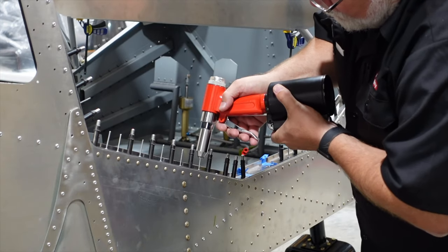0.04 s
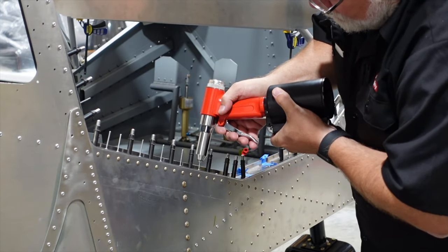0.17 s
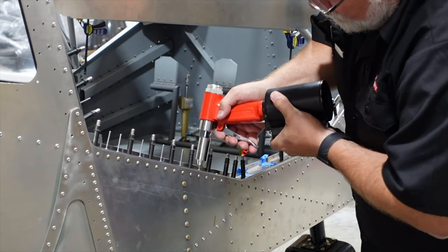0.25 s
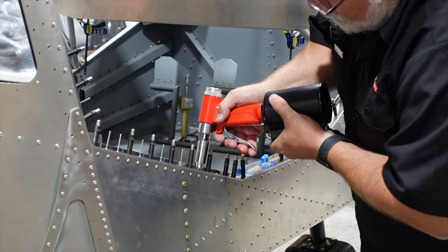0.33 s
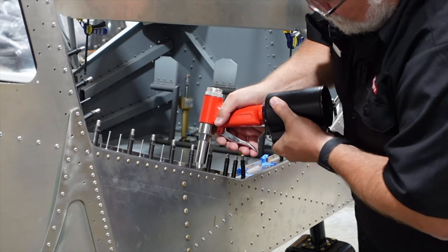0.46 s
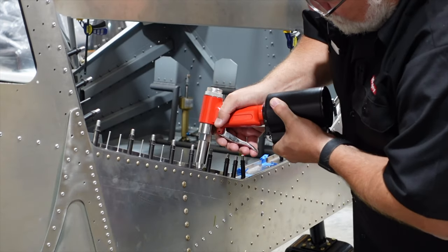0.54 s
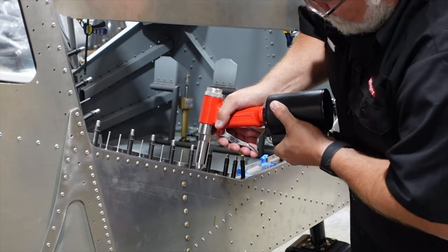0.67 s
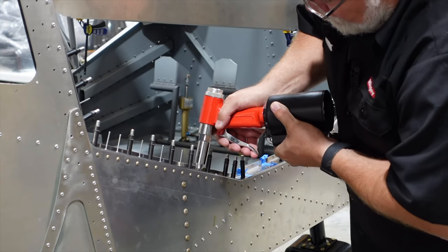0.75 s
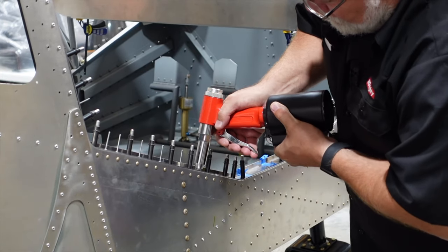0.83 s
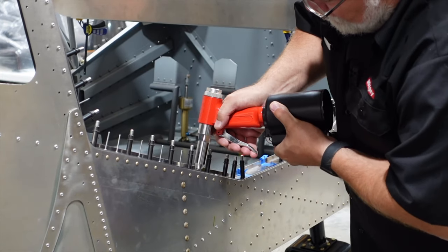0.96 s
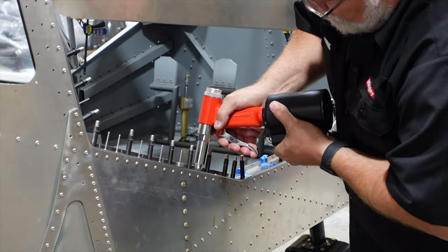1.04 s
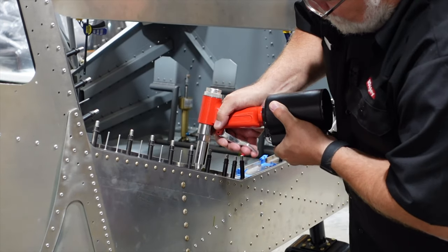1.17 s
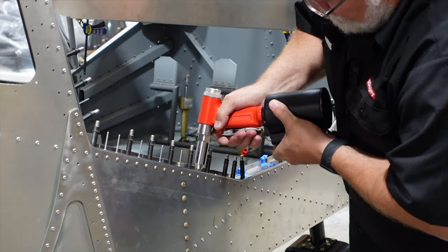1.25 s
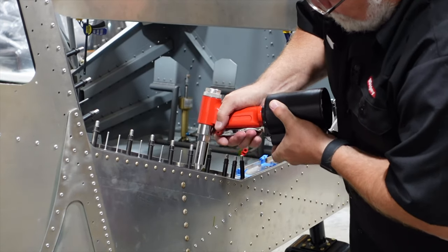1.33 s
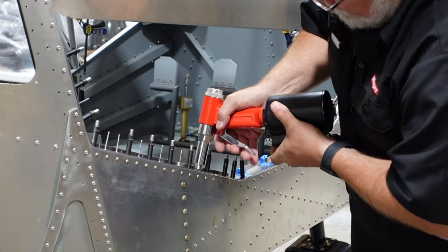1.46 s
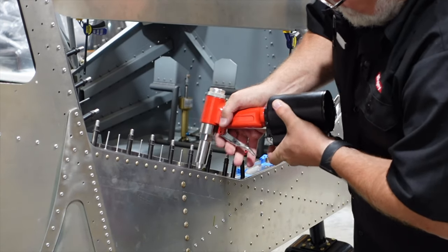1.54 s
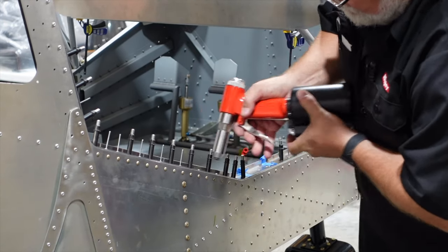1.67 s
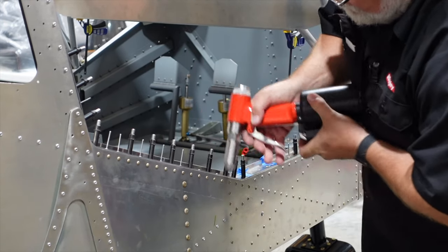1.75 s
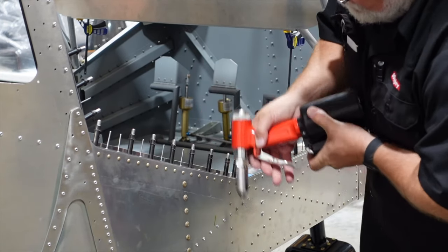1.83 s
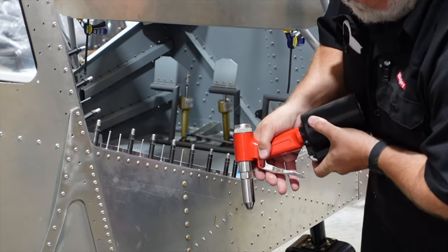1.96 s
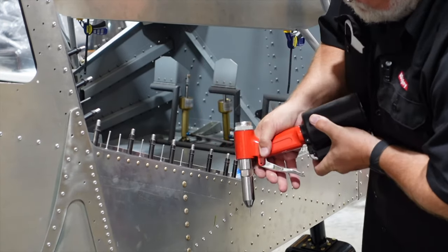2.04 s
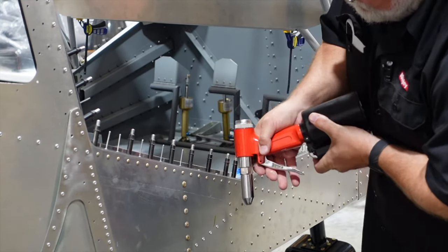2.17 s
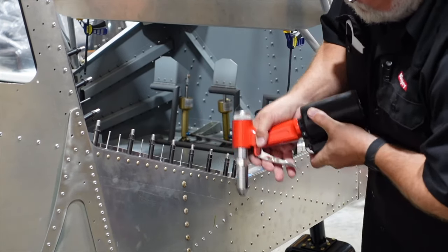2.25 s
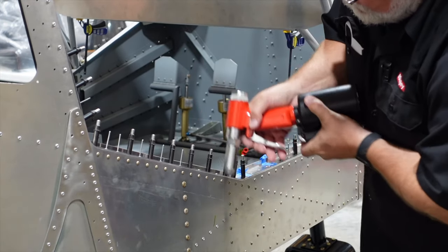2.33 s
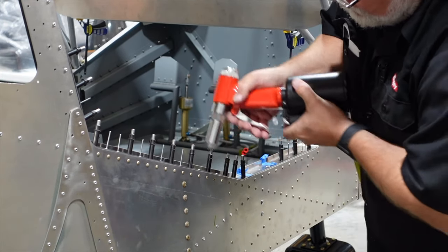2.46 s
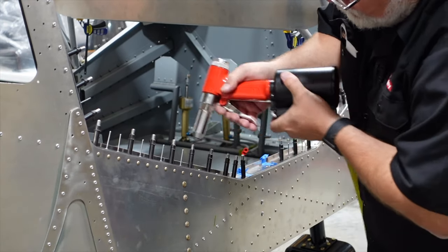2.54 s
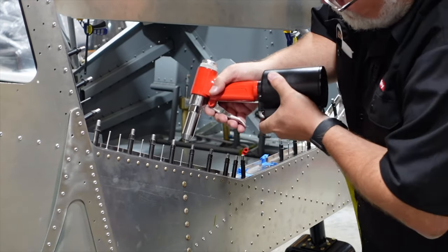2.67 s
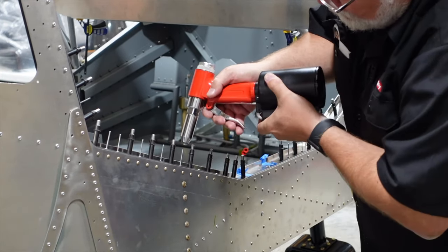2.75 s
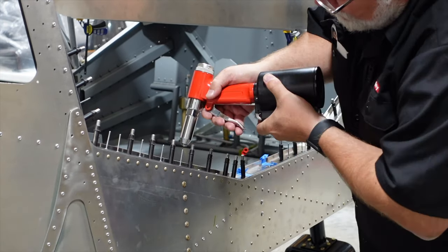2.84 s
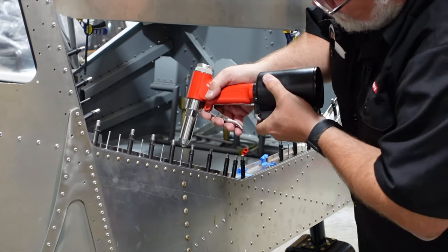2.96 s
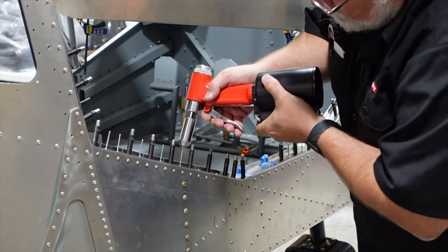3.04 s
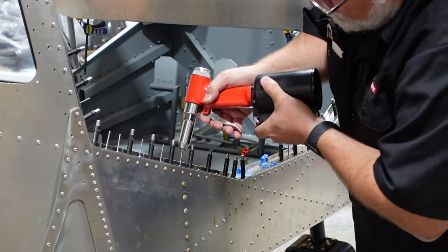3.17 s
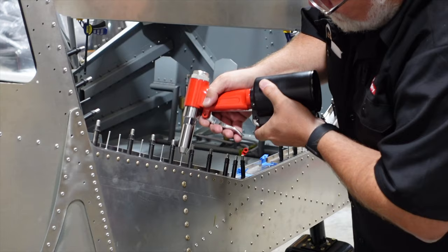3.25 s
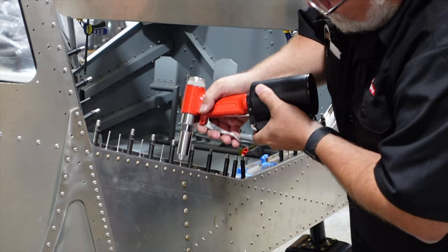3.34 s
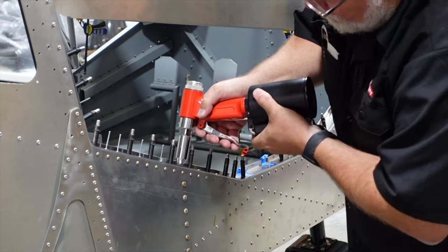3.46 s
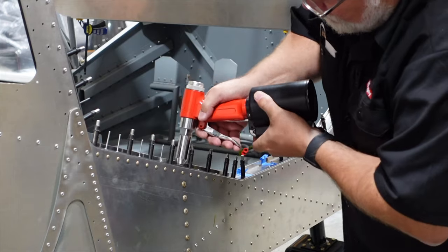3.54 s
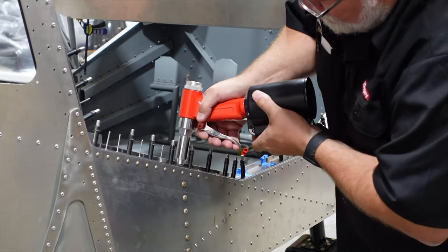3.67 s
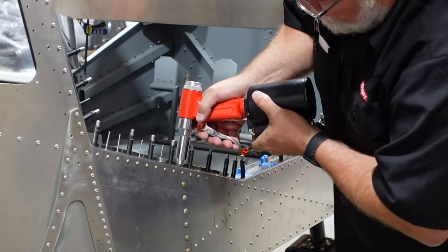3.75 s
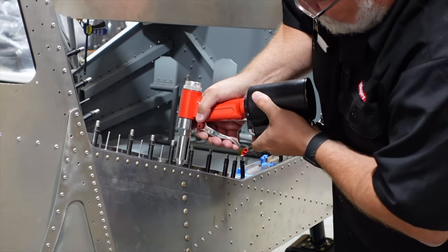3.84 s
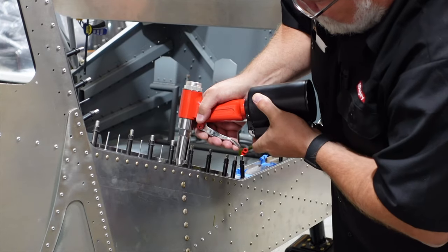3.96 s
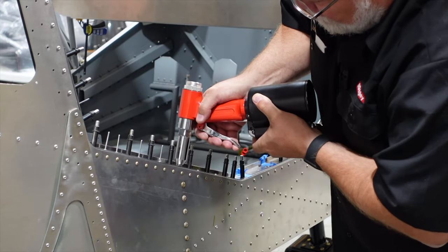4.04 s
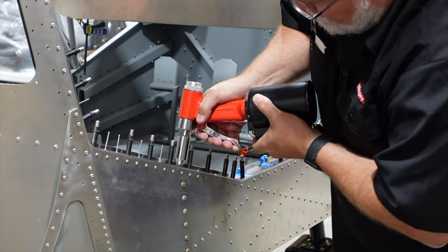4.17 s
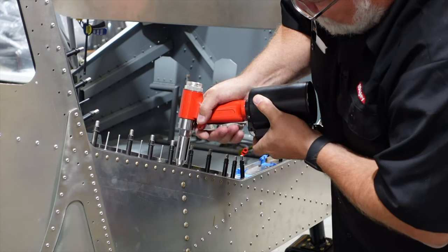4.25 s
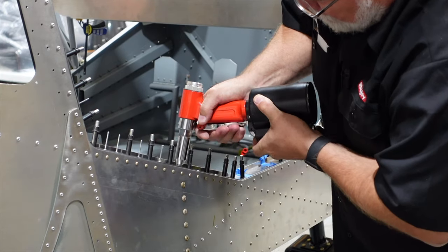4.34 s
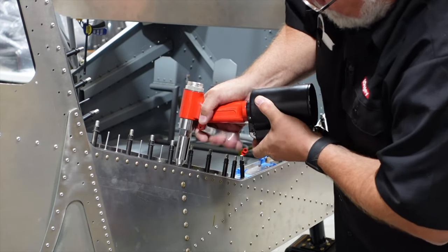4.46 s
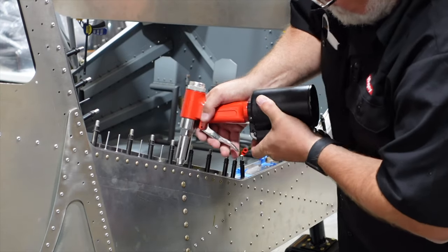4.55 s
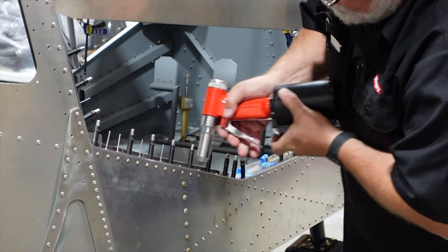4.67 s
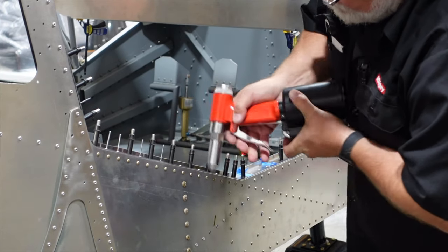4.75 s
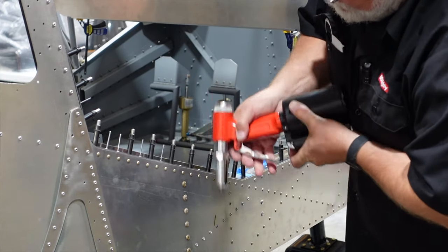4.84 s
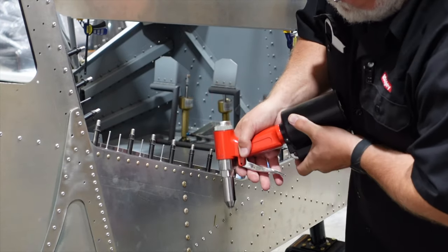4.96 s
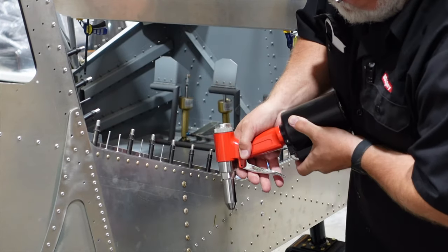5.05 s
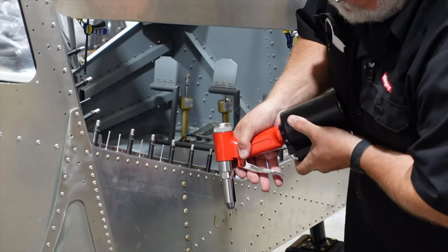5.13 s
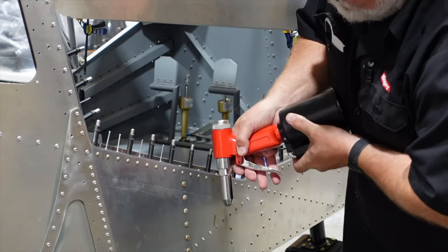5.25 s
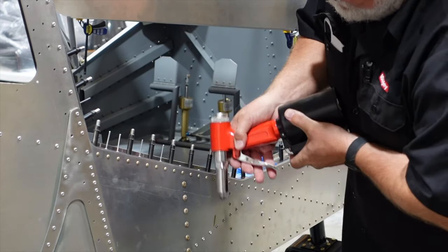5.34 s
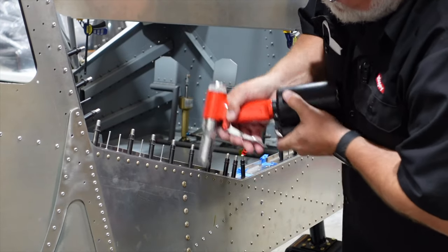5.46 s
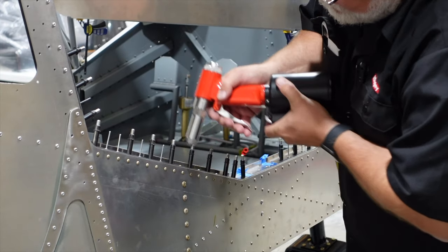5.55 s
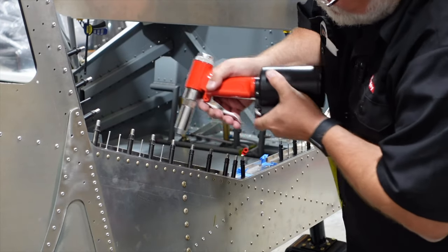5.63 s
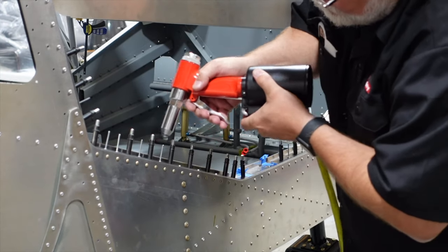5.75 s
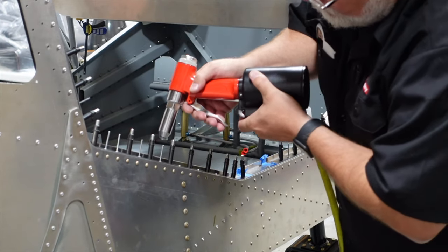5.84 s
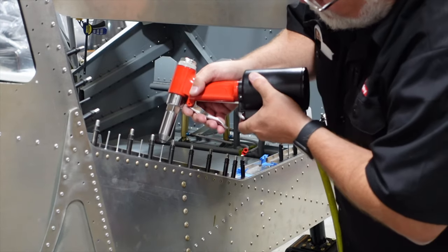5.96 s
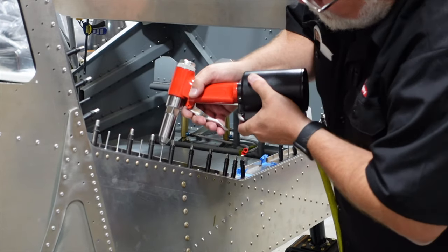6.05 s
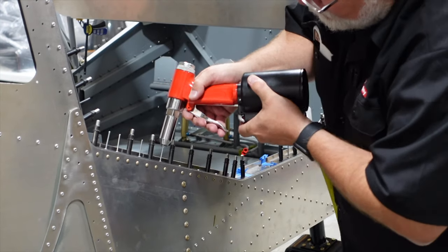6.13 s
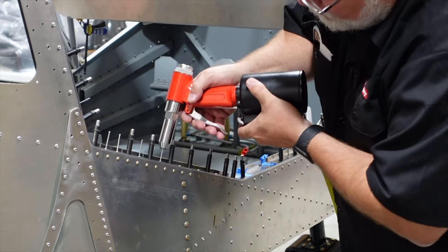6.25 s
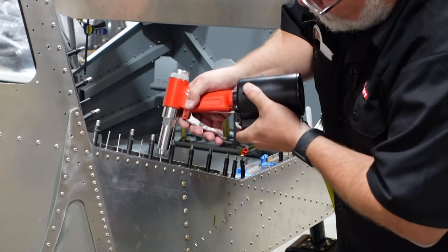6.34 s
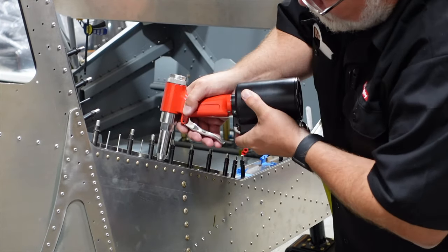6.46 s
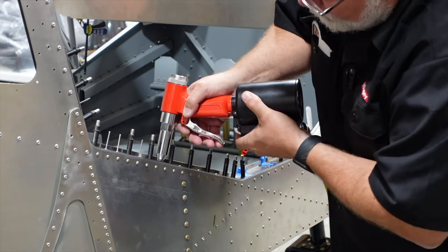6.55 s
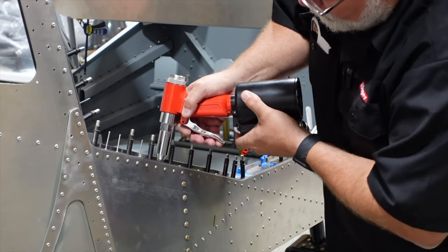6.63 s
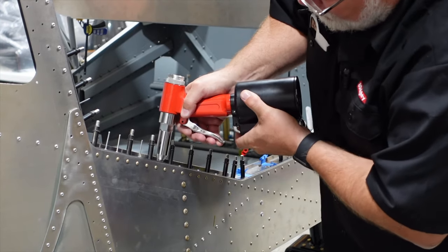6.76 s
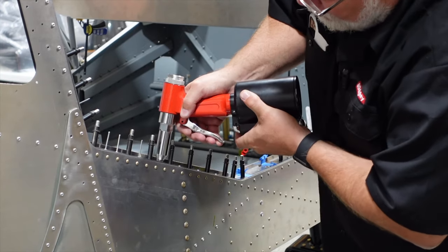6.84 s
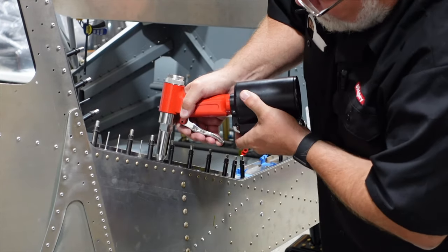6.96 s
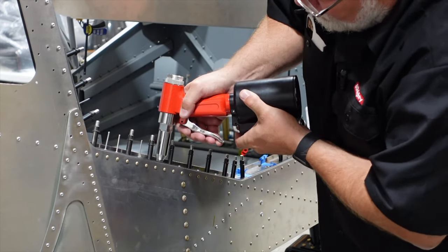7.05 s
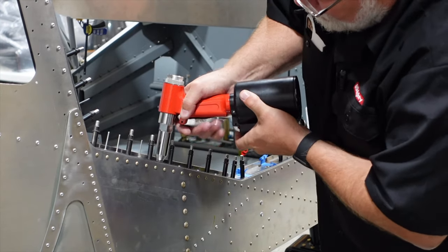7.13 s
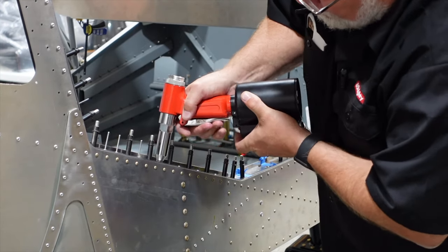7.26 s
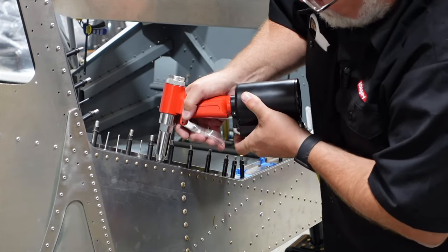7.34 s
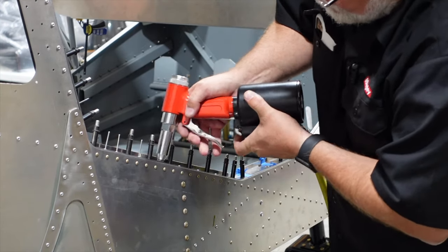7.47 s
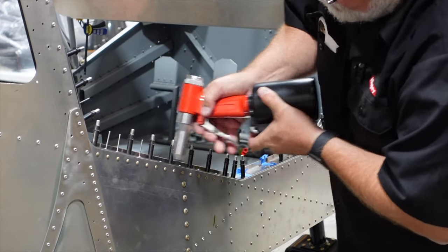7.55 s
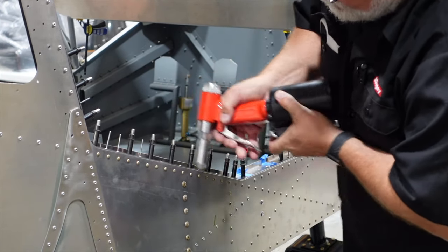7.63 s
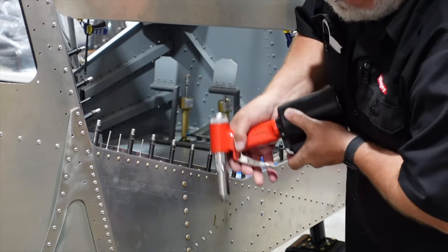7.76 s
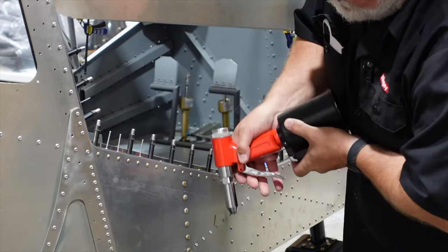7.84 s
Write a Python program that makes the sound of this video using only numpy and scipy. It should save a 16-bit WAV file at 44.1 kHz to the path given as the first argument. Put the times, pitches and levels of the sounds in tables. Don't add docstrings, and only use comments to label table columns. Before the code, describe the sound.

Three rivets are pulled about three seconds apart. Light metal rubbing and a tap lead to a firm clack and short hiss, then a sharp, very loud crack with a hollow sheet boom. A bright air exhaust follows, collapsing into thin hiss and a dry steel click. Tiny tinkles follow the first two. Close microphone, hard walls echoing, faint rumble and high whine.

```python
import sys
import numpy as np
from scipy import signal
from scipy.fft import rfft, irfft
from scipy.io import wavfile
from scipy.ndimage import uniform_filter1d

SR = 44100
rng = np.random.default_rng(int(sys.argv[2]) if len(sys.argv) > 2 else 0)


def undo_db(level):
    steps = np.asarray(level, float) / 20
    return 10 ** steps


def master_out(mix):
    frames = np.transpose(np.atleast_2d(mix))
    ceiling = np.clip(frames, -1, 1)
    pcm = np.round(ceiling * 32767).astype(np.int16)
    wavfile.write(sys.argv[1], SR, pcm)


N = 348390
TIME = np.arange(N) / SR

# [f/Hz, density/dB]
RUMBLE_SPECTRUM = [(12, -54.5), (20, -32), (29, -16), (41, -7), (54, 1), (92, 2), (108, 0.5), (177, -9),
                   (214, -18.5), (242, -19.5), (392, -32), (420, -28), (500, -31.5), (650, -59.5),
                   (1100, -120)]
# [f/Hz, density/dB]
HISS_SPECTRUM = [(120, -25.5), (200, -6.5), (482, -27), (623, -14), (899, -23), (986, -9), (1060, -14.5),
                 (2650, -25.5), (14300, -31.5), (16000, -45.5)]
# [f/Hz, level/dB]
LAMP_WHINES = [(8900, -95), (10300, -99), (11600, -105), (12900, -100)]
# [start t/s, end t/s, start level/dB, end level/dB]
SLIDES = [(0., .1, -80.5, -87), (.116, 0.357, -71, -66.5), (2.3, 2.46, -73.5, -84),
          (2.501, 2.751, -76.5, -82), (2.83, 2.923, -79, -85), (3.206, 3.427, -85, -77.5),
          (5.3, 5.416, -66.5, -78.5), (5.44, 5.991, -75, -85.5), (6.165, 6.326, -82, -89),
          (6.351, 6.464, -80.5, -68.5)]
# [f/Hz, density/dB]
SCRAPE_SPECTRUM = [(88, -29.5), (150, -0.5), (187, -2.5), (215, -14.5), (269, -7.5), (366, -26.5),
                   (655, -18.5), (701, -31), (971, -23), (1710, -32), (3390, -30), (7710, -48.5),
                   (9000, -52), (11700, -67.5), (19800, -120)]
# [f/Hz, level/dB, share of the ring t60]
NOSE_MODES = [(1941, -5, .8), (2269, -3.5, 1.3), (3030, -1.5, 1.), (3570, -2, 1.2), (3770, -3.5, 1.3),
              (7000, -22.5, .6)]
# [t/s, 500-3000 Hz peak
# level/dB, boom/dB, edge/dB, first crack/dB]
KNOCKS = [(0.119, -50, -9, -16, -16), (0.365, -32, -3, -14.5, -13), (1.265, -16.5, -5.5, -14, -24),
          (3.446, -24, -4, -15, 1.5), (4.306, -16, -5, -16.5, -16), (6.003, -55, -20.5, -26, -19),
          (6.107, -38, -17, -11.5, -26), (6.472, -32, -7, -11, -2), (7.178, -12.5, -7, -14, -15),
          (3.438, -28, -17, -8.5, -27), (2.24, -49.5, -10, -30, -25), (2.758, -57.5, -15, -26, -20),
          (5.726, -56.5, -14, -26, -20), (6.404, -52.5, -3.5, -8, -20), (2.083, -48.5, -5, -30, -25),
          (5.155, -49.5, -4.5, -30, -25)]
# [t/s, 500-3000 Hz peak level/dB]
SNAPS = [
    (1.33, -1.5),
    (4.369, -0.5),
    (7.246, -1.5),
]
# [f/Hz, level/dB, t60/s]
SKIN_MODES = [(162.55, 5.5, .35), (198, -4, 0.37), (257, -5, 0.41), (286, 1, 0.71), (506.6, -11.5, .4),
              (573.9, -2.5, .24), (627, -4, 0.42), (656.6, 1.5, .2), (778, -15, 0.29), (1109, -8.5, 0.43),
              (1274, -6, 0.25), (1445, -12.5, 0.38), (3930, -22.5, 0.28)]
# [f/Hz, density/dB]
SNAP_SPECTRUM = [(29, -50), (50, -25), (159, 2), (298, -7.5), (362, -15), (661, -9.5), (746, -15),
                 (1300, -11), (1780, -22.5), (3330, -22), (5400, -28), (10900, -28.5), (16000, -41.5)]
# [f/Hz, density/dB]
KNOCK_SPECTRUM = [(29, -44.5), (120, -13), (264, 1.5), (450, -23), (586, -11.5), (1120, -20), (1270, -17),
                  (1580, -25), (2320, -24.5), (3850, -27), (6240, -38.5), (14900, -49), (16000, -59)]
# [f/Hz, t60/s]
SKIN_T60 = [(60, 0.71), (150, 0.33), (300, 0.39), (700, 0.11), (1500, 0.21), (3500, 0.14), (8000, 0.11),
            (11000, 0.16), (15000, .17)]
# [f/Hz, t60/s]
SHOP_T60 = [(60, 1.1), (150, 1.5), (300, 1.2), (700, 0.72), (1500, 0.74), (3500, 0.91), (6500, 0.74),
            (11000, 0.59), (15000, 0.64)]
# [f/Hz, level against the blow/dB]
WALL_LEVELS = [(60, -10.5), (300, -12), (1500, -11.5), (3500, -7), (8000, -13), (15000, -12.5)]
# [t/s, peak level/dB, ring t60/s]
TAPS = [(0.1191, -49.5, 0.035), (0.2944, -63, 0.024), (2.0833, -31.5, 0.025), (2.805, -55.5, 0.021),
        (3.194, -56.5, 0.039), (3.2254, -68, 0.04), (3.282, -65, 0.044), (3.3914, -64, 0.04),
        (5.1547, -28, 0.033), (6.108, -50.5, 0.15), (0.366, -46, 0.12), (3.446, -36, 0.12),
        (6.003, -64, 0.027), (6.471, -44.5, 0.15)]
# [valve opens t/s, 1.5-5 kHz level/dB, brightness over 8 kHz/dB]
FILLS = [
    (1.258, -32, -9.5),
    (4.299, -33, -11.5),
    (7.173, -34.5, -7.5),
]
# [t/s, jet level/dB, first burst over it/dB, empty-cylinder level/dB, return-stroke level/dB]
VENTS = [
    (1.447, -21, 5.5, -48.5, -45),
    (4.505, -21, 1, -39, -43),
    (7.384, -20, -0.15, -43, -44),
]
PISTON_HOME = [2.078, 5.15, 8.03]
# [f/Hz, density/dB]
JET_SPECTRUM = [(410, -43), (700, -12.5), (984, -10), (1060, -10.5), (1640, -5.5), (2190, 0), (2730, -3.5),
                (3460, 0.5), (6650, -8.5), (9860, -8.5), (10800, -6.5), (15200, -13), (16000, -19.5)]
# [f/Hz, width/Hz, level/dB]
PORT_RESONANCES = [(1900, 500, -6), (3370, 200, 5), (4600, 700, -10), (10500, 1000, -3), (11900, 900, -6),
                   (13800, 1000, -5), (15000, 1200, -10)]
# [t/s, tick level/dB, ring level/dB, ring f/Hz, ring t60/s]
STEM_BOUNCES = [(2.333, -76, -86, 8400, .05), (2.520, -64, -77, 6400, .8), (2.865, -71, -77, 6400, .6),
                (2.992, -75, -81, 6400, 1.3), (5.435, -80, -71, 8400, .06), (5.490, -80, -73, 8250, .06),
                (5.638, -58, -73, 6250, .7), (5.918, -69, -80, 6250, .8), (6.525, -75, -69, 8200, .07)]


def across(table, hz):
    f, value = np.transpose(table)
    return np.interp(np.log(hz), np.log(f), value)


def colour(x, table, lo=1, hi=SR):
    hz = np.arange(len(x) // 2 + 1) * SR / len(x) + 1
    gain = undo_db(across(table, hz))
    inside = (hz > lo) * (hz < hi)
    return irfft(rfft(x) * gain / np.sqrt(np.mean(gain ** 2 * inside)), len(x))


def band(x, lo_hz, hi_hz):
    return signal.sosfilt(signal.butter(2, [lo_hz, min(hi_hz, .45 * SR)], "band", fs=SR, output="sos"), x)


def rings(modes, length=1.):
    t = np.arange(int(length * SR)) / SR
    return sum(undo_db(db - 60 * t / t60) * np.sin(2 * np.pi * hz * t) for hz, db, t60 in modes)


def fade(x, t60, unit=False):
    pole = undo_db(-120 / (max(t60, .002) * SR))
    return signal.lfilter([1 - pole * unit], [1, -pole], x)


def flicker(rate, db):
    k = int(SR / rate)
    steps = np.repeat(rng.standard_normal(N // k + 1), k)
    return undo_db(db * uniform_filter1d(steps, k)[:N])


def heard(x, response):
    return signal.fftconvolve(x, response)[:N]


def played(spans, column, hold=0, edge=0.0021):
    rows = np.vstack([np.r_[s, [[s[-1][0] + hold, *s[-1][1:]]]] for s in spans])
    gain = undo_db(np.interp(TIME, rows[:, 0], rows[:, column]))
    if column > 1:
        return gain
    on = sum(np.clip(np.minimum(TIME - s[0][0], s[-1][0] + hold - TIME) / edge, 0, 1) for s in spans)
    return gain * on


def droning():
    bed_db, stir_db, stir_share = -67, -42.5, 0.67
    build_s, t60_s = 0.23, 5.5
    blows = np.zeros(N)
    for s, db, *_ in SNAPS + KNOCKS:
        blows[int(s * SR)] = undo_db(db * stir_share + stir_db) ** 2
    return np.sqrt(undo_db(bed_db) ** 2 + fade(fade(blows, build_s, unit=True), t60_s))


def shop():
    hum_hz, hum_db, hiss_db = 55.6, -6.5, -80
    hum = band(rng.standard_normal(N), hum_hz - 3, hum_hz + 3)
    rumble = colour(rng.standard_normal(N), RUMBLE_SPECTRUM, 35, 130) + undo_db(hum_db) * hum / hum.std()
    hiss = colour(rng.standard_normal(N), HISS_SPECTRUM, 330, 16000) * undo_db(hiss_db)
    lamps = sum(undo_db(db) * flicker(17, 3.0) * np.sin(2 * np.pi * hz * TIME) for hz, db in LAMP_WHINES)
    return rumble * droning() + hiss + lamps


def rubs():
    creep_s, start_db, creep_db = 0.029, -81.5, -57.5
    catch_s, catch_db = 0.0056, -41.5
    creeps = [[(s - creep_s, start_db), (s - catch_s / 2, creep_db), (s + catch_s / 2, catch_db)]
              for s, _, _ in FILLS]
    nose_slides = [[(a, db_a), (b, db_b)] for a, b, db_a, db_b in SLIDES]
    return sorted(creeps + nose_slides)


def slides():
    grit = rng.standard_normal(N) * flicker(90, 3.5) * flicker(25, 2.5)
    nose = heard(grit, rings([(hz, db, 0.014 * share) for hz, db, share in NOSE_MODES], .1))
    sheet = colour(grit / grit.std(), SCRAPE_SPECTRUM, 500, 4500)
    return (sheet + .35 * nose / nose.std()) * played(rubs(), column=1, hold=.006)


def strike(blows, rise, modes_db, boom_shift_db, edge_shift_db):
    out, push, t = np.zeros(N), np.zeros((3, N)), np.arange(SR // 20) / SR
    shape = np.exp(-t / max(rise, 1e-4))
    for s, db, boom_db, edge_db, crack_db in blows:
        i, boom_db = int(s * SR), boom_db + boom_shift_db
        part_power = undo_db([db + boom_db, db, db + edge_db + edge_shift_db]) ** 2
        push[:, i:i + len(t)] += np.outer(part_power, shape / shape.sum())

        burst = rng.standard_normal(len(t)) * np.exp(-t / 0.0018)
        crack = band(burst, 700, 3500) + undo_db(edge_db - 12) * band(burst, 4500, 13000)
        out[i:i + len(t)] += undo_db(db + crack_db) * crack / np.abs(crack).max()

        detunes = rng.standard_normal((len(SKIN_MODES), 2))
        modes = [(hz * (1 + .015 * a), level + 2 * b + boom_db * (hz < 400), t60)
                 for (hz, level, t60), (a, b) in zip(SKIN_MODES, detunes)]
        ring = rings(modes, .5)
        swell = 1 - np.exp(-TIME[:len(ring)] / 0.014)
        out[i:i + len(ring)] += undo_db(db + modes_db) * ring * swell
    return out, push


def skin():
    boom_db, edge_db, crack_db = -14, -7.5, 2
    breaks = [(*s, boom_db, edge_db, crack_db) for s in SNAPS]
    snaps, hard = strike(breaks, rise=.0015, modes_db=-13, boom_shift_db=7, edge_shift_db=6)
    knocks, soft = strike(KNOCKS, rise=0.0052, modes_db=-16, boom_shift_db=4.0, edge_shift_db=13.5)
    out = snaps + knocks
    for hz in 40 * 2 ** np.arange(0, 8.8, 1 / 3):
        part = int(hz > 400) + int(hz > 4000)
        snap_power = hard[part] * undo_db(across(SNAP_SPECTRUM, hz) - 35.5) ** 2
        knock_power = soft[part] * undo_db(across(KNOCK_SPECTRUM, hz) - 33) ** 2
        power = fade((snap_power + knock_power) * hz, 9000 / hz / max(hz, 300), unit=True)
        sheet = fade(power, across(SKIN_T60, hz))
        spread = fade(power, 0.34, unit=True)
        walls = undo_db(across(WALL_LEVELS, hz)) ** 2 * fade(spread, across(SHOP_T60, hz))
        noise = band(rng.standard_normal(N), hz / 2 ** (1 / 6), hz * 2 ** (1 / 6))
        out += noise / noise.std() * np.sqrt(sheet + walls)
    return out


def taps():
    out, t = np.zeros(N), np.arange(SR // 5) / SR
    for s, db, t60 in TAPS:
        burst = rng.standard_normal(len(t)) * np.exp(-t / .0025)
        tick = band(band(burst, 500, 5500), 900, 5500)
        ring = rings([(hz, level, share * t60) for hz, level, share in NOSE_MODES], .2)
        out[int(s * SR):][:len(t)] += undo_db(db) * (undo_db(0.5) * tick + undo_db(-9) * ring)
    return out


def air(spans, whistle, hold):
    jet = colour(rng.standard_normal(N), JET_SPECTRUM, 1500, 5000)
    noise = rng.standard_normal(N)
    port = sum(undo_db(db) * flicker(12, 2.7) * band(noise, hz - width / 2, hz + width / 2)
               for hz, width, db in PORT_RESONANCES)
    gain = played(spans, column=1, hold=hold)
    weak = np.clip(1 - gain / undo_db(-29.5), 0, 1)
    mix = jet * (1 - .55 * weak) + whistle * weak * port / port.std()
    low = signal.sosfiltfilt(signal.butter(2, 7000, fs=SR, output="sos"), mix)
    high = (mix - low) / band(mix, 8000, 15000).std() * played(spans, column=2, hold=hold)
    return gain * flicker(40, .6) * (low + high)


def fills():
    open_s, ends_before_snap_s = .006, .009
    start_db, grow_db, brighten_db = -8, 1.5, 2.5
    return [[(s, db + start_db, bright - 3),
             (s + open_s, db, bright),
             (snap - ends_before_snap_s, db + grow_db, bright + brighten_db)]
            for (s, db, bright), (snap, _) in zip(FILLS, SNAPS)]


def vents():
    open_s, settle_s, choked_s, empty_s, return_s = 0.0094, .028, 0.18, 0.33, .445
    start_db, sag_db_per_s = -6, 61.5
    bright_db, dull_per_db = 1.5, 0.82
    return_sag_db, return_bright_db, return_dull_db = 6, -8.5, 5
    out = []
    for (s, db, burst_db, empty_db, back_db), home in zip(VENTS, PISTON_HOME):
        burst = [(s, db + start_db, bright_db), (s + open_s, db + burst_db, bright_db - burst_db / 2)]
        blow = [(settle_s, db), (choked_s, db - sag_db_per_s * (choked_s - settle_s)), (empty_s, empty_db)]
        blow_down = [(s + t, level, bright_db - dull_per_db * (db - level)) for t, level in blow]
        stroke = [(s + return_s, back_db, return_bright_db),
                  (home, back_db - return_sag_db, return_bright_db - return_dull_db)]
        out.append(burst + blow_down + stroke)
    return out


def stems():
    out, t = np.zeros(N), np.arange(SR) / SR
    for s, tick_db, ring_db, hz, t60 in STEM_BOUNCES:
        splash = rng.standard_normal(len(t)) * (np.exp(-t / 0.0071) + 0.41 * np.exp(-t / .03))
        tick = band(splash, 10500, 17000) + .7 * band(splash, 700, 9000) * np.exp(-t / .005)
        line = band(rng.standard_normal(len(t)), hz - 55, hz + 55)
        ring = line / line.std() * undo_db(ring_db - 60 * t / t60) * (.8 + 2 * np.exp(-t / .025))
        out[int(s * SR):][:SR] += undo_db(tick_db) * tick + ring
    return out


def diffuse(t60s, tilt, cycles, length=2.):
    t, out = np.arange(int(length * SR)) / SR, 0
    for hz in 40 * 2 ** np.arange(0, 9, .5):
        noise = band(rng.standard_normal(len(t)), hz / 2 ** .25, hz * 2 ** .25)
        decay = undo_db(across(tilt, hz) - 60 * t / across(t60s, hz))
        out = out + noise * decay * (1 - np.exp(-t * hz / cycles))
    return out / np.abs(out).max()


def wall_echo(tool):
    tilt = [(40, 3.0), (300, -8.5), (3400, -5.5), (6000, -8), (16000, -7.5)]  # f/Hz, level/dB
    walls = diffuse(SHOP_T60, tilt, cycles=6.6, length=1.7)
    walls = np.r_[np.zeros(int(.012 * SR)), walls] / np.sqrt(np.sum(walls ** 2))
    return undo_db(-8.5) * heard(tool, walls)


def scene():
    filling = air(fills(), whistle=0.75, hold=.02)
    exhaust = air(vents(), whistle=0.88, hold=0.0052)
    tool = slides() + taps() + filling + exhaust
    return (shop() + skin() + tool + wall_echo(tool) + stems())[None]


def low_pass(x):
    return signal.sosfilt(signal.butter(12, 16990, fs=SR, output="sos"), x)


def record(dry):
    cut = signal.sosfilt(signal.ellip(8, .2, 60, 16100, fs=SR, output="sos"), dry)
    return low_pass(np.clip(cut, -1, 1))


dry = scene()
out = record(dry)
master_out(out)
```